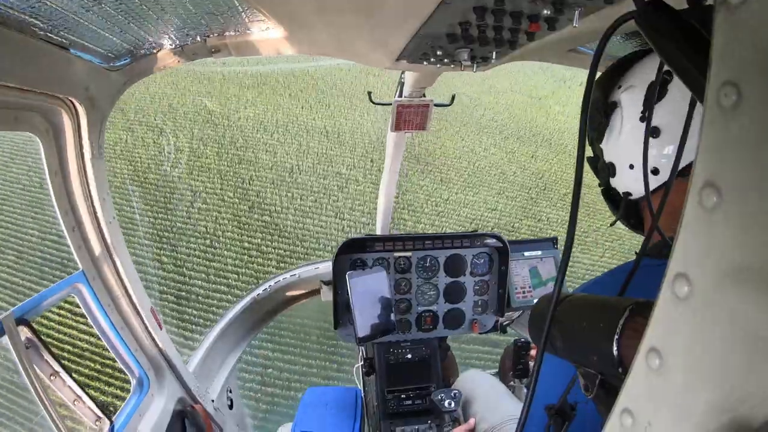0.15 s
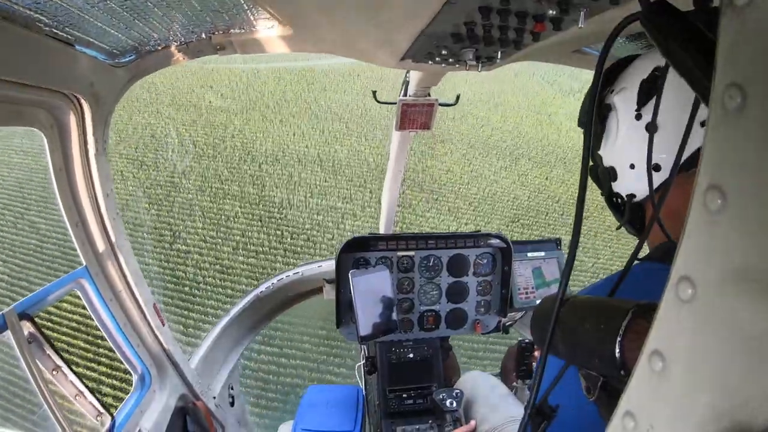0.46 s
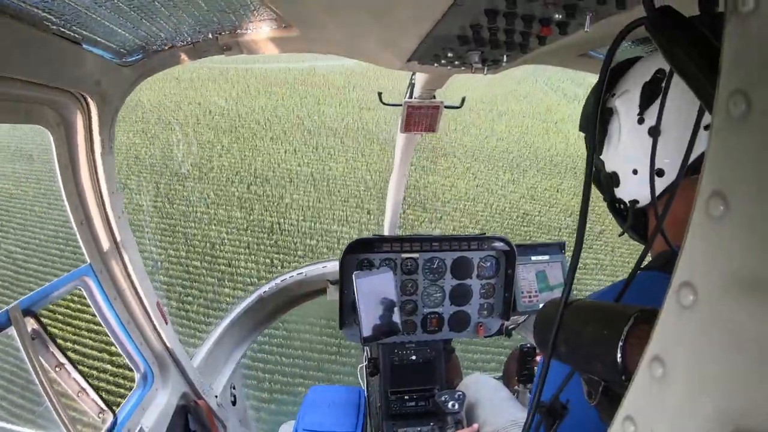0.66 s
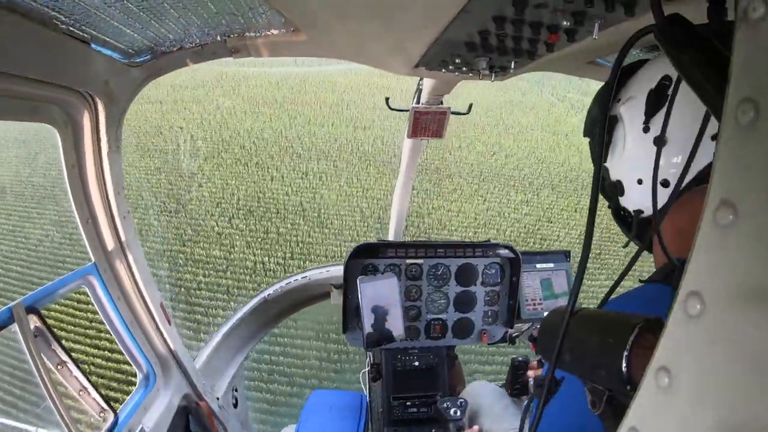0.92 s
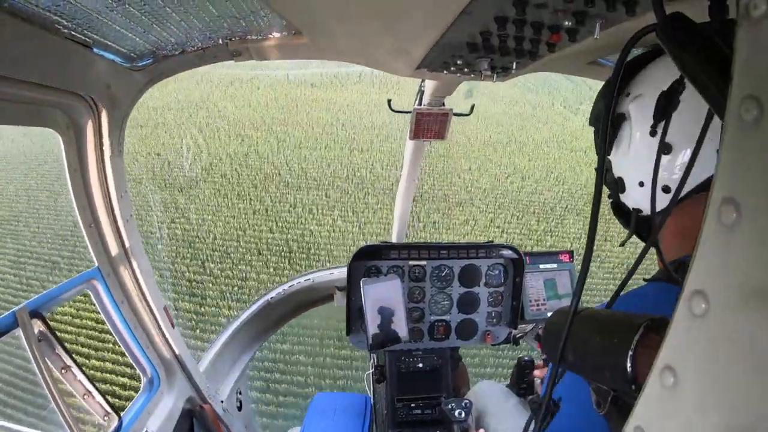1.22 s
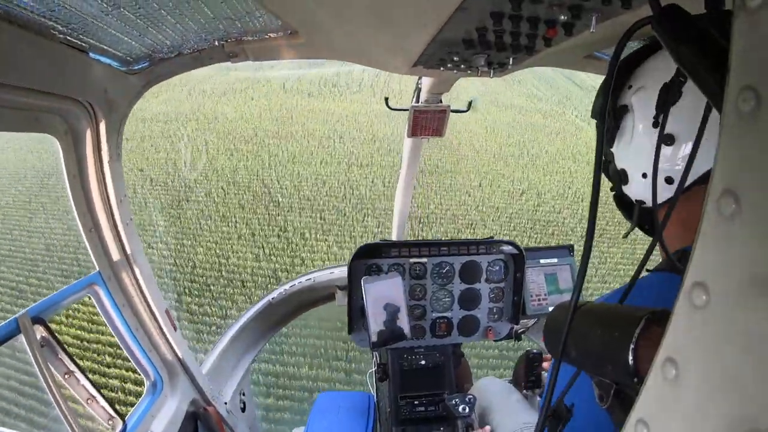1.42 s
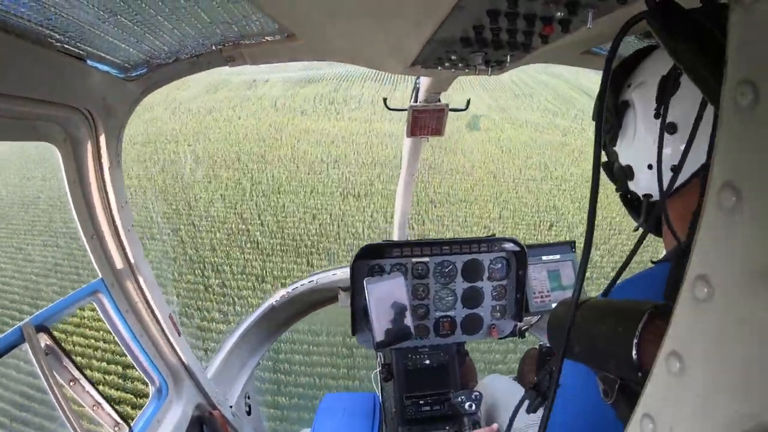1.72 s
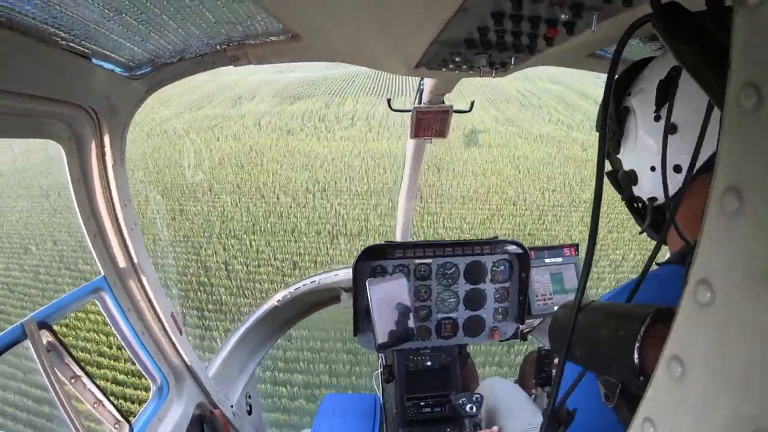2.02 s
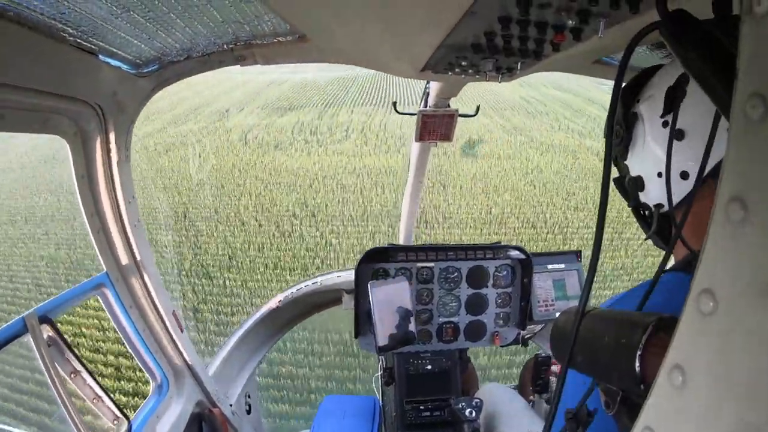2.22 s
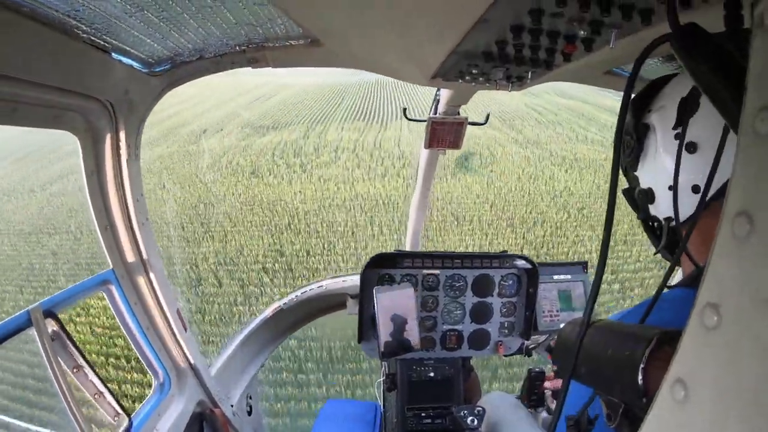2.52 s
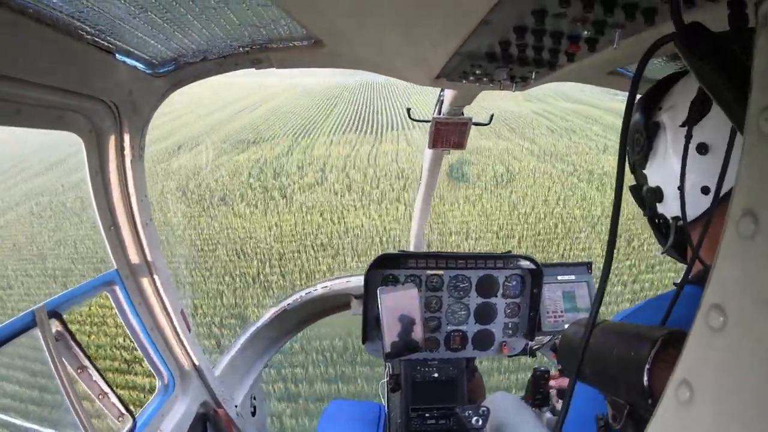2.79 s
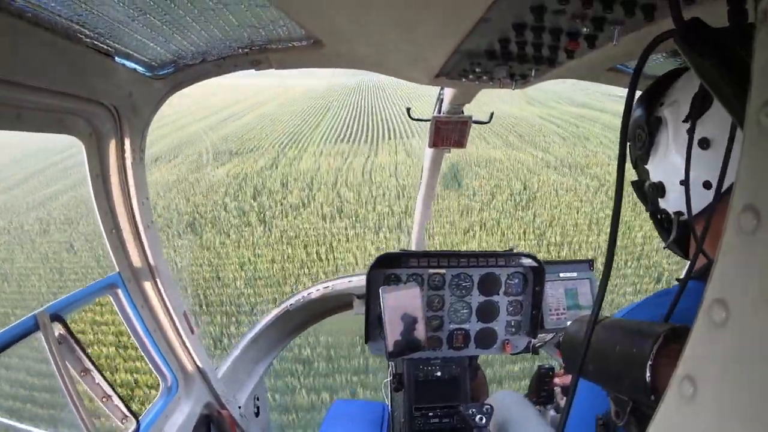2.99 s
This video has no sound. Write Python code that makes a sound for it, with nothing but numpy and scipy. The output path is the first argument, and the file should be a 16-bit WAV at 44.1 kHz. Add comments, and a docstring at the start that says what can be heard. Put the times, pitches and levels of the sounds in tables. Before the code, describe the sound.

Helicopter in steady flight, recorded inside the cockpit: rapid low rotor drumming, boomy air roar, and a continuous gear and turbine whine that rises very slightly; close, enclosed, loud, without speech.

```python
"""A turbine helicopter in steady low flight, heard inside the cockpit.
The two-bladed main rotor drums on the cabin and the tail rotor hums: both are sums of slightly unsteady tones.
Gears sing and the gas turbine whines in the same way; the turbine speeds up a little.
Air roars around the cabin and hisses through the door seals, puffing with each blade: both are shaped noise."""
import sys
import numpy as np
from scipy import signal
from scipy.fft import rfft, irfft, next_fast_len
from scipy.io import wavfile
from scipy.ndimage import uniform_filter1d

SR = 44100
rng = np.random.default_rng(int(sys.argv[2]) if len(sys.argv) > 2 else 0)


def pcm_store(signal):
    """Save signal as 16-bit PCM."""
    levels = np.round(np.clip(np.atleast_2d(signal), -1, 1) * 32767)
    wavfile.write(sys.argv[1], SR, levels.astype(np.int16).T)


N = 138915
TIME = np.arange(N) / SR  # s

# Level drift [dB] of input gear mesh, planet mesh and turbine shaft; flutter [share of tone] of the latter two
STEADY_DRIFT_DB, STEADY_FLUTTER = 0.24, 0.13


def amp(db):
    """Turns decibels into a gain."""
    return 10 ** (np.asarray(db) / 20)


def unit(x):
    """Scales a signal to an rms (average strength) of 1."""
    return x / np.sqrt(np.mean(abs(x) ** 2) + 1e-20)


def curve(points, column=1):
    """Joins one column of (time, value, ..) rows by straight lines."""
    table = np.transpose(points)
    return np.interp(TIME, table[0], table[column])


def colour(points, hz):
    """Reads the gain at each frequency from (frequency [Hz], level [dB]) rows."""
    f, db = np.transpose(points)
    return amp(np.interp(np.log(hz + 1), np.log(f + 1), db))


def shaped(gain):
    """Makes noise of rms 1 whose spectrum follows gain(Hz)."""
    size = next_fast_len(N + SR)
    spectrum = rfft(rng.standard_normal(size))
    noise = irfft(spectrum * gain(np.fft.rfftfreq(size, 1 / SR)), size)
    return unit(noise[:N])


def wander(hz):
    """Makes a random motion of rms 1, mostly slower than hz."""
    motion = shaped(lambda f: 1 / (1 + (f / hz) ** 3))
    return unit(motion - motion.mean())


def tone(turns, db, drift_db, flutter):
    """Makes one sine tone that drifts in level and flutters in level and phase."""
    drift_hz, flutter_hz = 4, 23.3
    # The two parts of a complex number shake level and phase together
    jitter = (wander(flutter_hz) + 1j * wander(flutter_hz)) / np.sqrt(2)
    body = unit((1 + flutter * jitter) * amp(drift_db * wander(drift_hz)))
    spin = np.exp(2j * np.pi * (turns + rng.random()))  # starts at a random phase
    return np.sqrt(2) * amp(db) * (body * spin).real


def rotors(blade):
    """Passing main and tail rotor blades drum on the cabin at multiples of their blade rates."""
    # Main rotor tones: multiples of the blade rate, and their levels [dB]
    main_orders = [1, 2, 4, 5, 6, 7]
    main_db = [-29.5, -32, -24, -29, -30, -33]
    # The cabin booms most at the third multiple: (time [s], level [dB])
    boom_db = [(0, -38), (.5, -16), (1, -20.5), (1.45, -21), (1.7, -18), (2.2, -15), (2.45, -19),
               (2.8, -15.5), (3.15, -17.5)]
    # Tail rotor's own blade tone: (time [s], level [dB])
    tail_db = [(0, -36), (.7, -24), (1.4, -20), (1.8, -27.5), (2.2, -34), (2.6, -25.5), (3.15, -25.5)]
    # Its overtones: (multiple of the tail blade rate, level [dB])
    tail_overtones = [(2, -34), (3, -33), (5, -39)]
    tail_order = 6.49  # tail blade passes per main blade pass
    drift_db, flutter = 2.54, 0.059

    out = tone(3 * blade, curve(boom_db), drift_db=-1.0, flutter=0.07)
    for order, db in zip(main_orders, main_db):
        out += tone(order * blade, db, drift_db, flutter)
    for harmonic, db in [(1, curve(tail_db))] + tail_overtones:
        out += tone(harmonic * tail_order * blade, db, drift_db, flutter)
    return out


def gearbox(blade):
    """Meshing teeth and turning shafts sing at fixed multiples of the main rotor's blade rate."""
    # Input gear's mesh tone: (time [s], level [dB])
    bevel_db = [(0, -36), (.8, -31.5), (1.5, -33.5), (2.3, -34.5), (3.15, -39.5)]
    # Lesser gears and shafts: multiples of the blade rate, and their levels [dB]
    gear_orders = [7.63, 42.24, 57, 76.32, 129.73, 147.33, 150.34, 162.9, 169, 198]
    gear_db = [-25.5, -37, -37.5, -40.5, -51, -43.5, -46, -53, -64, -56.5]
    # High gear whines that swell and fade: multiples of the blade rate
    whine_orders = [190.78, 290, 381.54, 1055.6]
    # Their levels: (time [s], level of 1st, 2nd, 3rd, 4th whine [dB])
    whine_db = [(0, -42, -45, -54, -80), (.16, -45.5, -51, -44, -71), (.7, -47.5, -53, -46, -75),
                (1.15, -49.5, -47, -49.5, -86), (1.6, -47.5, -54, -49, -78), (2.1, -46, -55, -45, -78),
                (2.65, -44.5, -51, -48, -68), (3.15, -47, -55, -47.5, -73)]

    out = tone(145 * blade, curve(bevel_db), STEADY_DRIFT_DB, flutter=0.28)
    for order, db in zip(gear_orders, gear_db):
        out += tone(order * blade, db, drift_db=1.87, flutter=0.31)
    for column, order in enumerate(whine_orders, 1):
        out += tone(order * blade, curve(whine_db, column), drift_db=1.3, flutter=0.43)
    return out


def planets(blade):
    """The planet gears circle inside their ring, which splits their mesh tone into sidebands."""
    # Mesh tone and its sidebands, one blade rate apart from -3 to +3: level before the swell [dB]
    planet_db = [-46.5, -37, -49.5, -22, -33, -43, -38]
    # The same for the mesh tone's restless octave [dB]
    octave_db = [-50, -67, -45, -42, -36.5, -62, -46]
    # Swell of each group: (time [s], change of level [dB])
    planet_swell = [(0, -2.5), (.4, 1), (1, -1), (2.2, 1), (2.7, -2.5), (3.15, -2)]
    octave_swell = [(0, 6), (.45, 3.5), (.75, -7), (1.15, 4.5), (1.6, -5), (2.25, 0), (2.6, -1), (3.15, 1)]
    mesh_order = 49.116  # multiple of the blade rate

    out = np.zeros(N)
    lowest = -(len(planet_db) // 2)
    for side, (mesh_level, octave_level) in enumerate(zip(planet_db, octave_db), lowest):
        mesh_turns = (mesh_order + side) * blade
        octave_turns = (2 * mesh_order + side) * blade
        out += tone(mesh_turns, mesh_level + curve(planet_swell), STEADY_DRIFT_DB, STEADY_FLUTTER)
        out += tone(octave_turns, octave_level + curve(octave_swell), drift_db=2.5, flutter=0.6)
    return out


def turbine():
    """The spinning shaft sounds a tone and overtones; accessory gears and compressor blades whine above."""
    # Shaft speed: (time [s], turns per second [Hz])
    shaft = [(0, 759.4), (.25, 765.8), (.55, 769.3), (.9, 768.9), (1.4, 767.7), (1.75, 768.8), (2.1, 774.8),
             (2.45, 779.9), (3.15, 788.3)]
    # Shaft tone: (time [s], level [dB])
    shaft_db = [(0, -20), (1.1, -21), (1.75, -19.5), (2.3, -24), (3.15, -25)]
    # Overtones: multiples of the shaft speed, and their levels [dB]
    turbine_orders = [3, 4, 6.135, 8.083]
    turbine_db = [-57.5, -57.5, -59, -72]
    # Accessory gear whine and compressor whine: (time [s], level [dB])
    accessory_db = [(0, -64), (.1, -56), (.21, -44.5), (.38, -58.5), (.6, -50.5), (1.2, -50.5),
                    (1.65, -47.5), (2.1, -54), (2.5, -57.5), (2.75, -50.5), (3.15, -53)]
    compressor_db = [(0, -69), (.4, -74), (1.2, -74), (1.8, -75), (2.5, -75), (2.9, -71), (3.15, -71)]

    turns = np.cumsum(curve(shaft)) / SR
    out = tone(turns, curve(shaft_db), STEADY_DRIFT_DB, STEADY_FLUTTER)
    for order, db in zip(turbine_orders, turbine_db):
        out += tone(order * turns, db, drift_db=3.5, flutter=0.3)
    out += tone(7.0833 * turns, curve(accessory_db), drift_db=1.0, flutter=0.34)
    out += tone(16 * turns, curve(compressor_db), drift_db=0.0, flutter=1.3)
    return out


def roar(blade):
    """Faintly patchy air noise booms in the cabin; the rotor wash buffets its upper middle band."""
    # Colour of the roar: (frequency [Hz], relative level [dB])
    roar_colour = [(8, -19), (25, -11), (45, -5.5), (66, -9.5), (105, -6), (135, -5), (170, 1), (195, -2.5),
                   (215, -12), (250, -5), (300, -10), (480, -13), (750, -15.5), (1000, -19.5), (1160, -27),
                   (1290, -24.5), (1420, -31), (2000, -30), (2800, -33.5), (3600, -38), (4700, -43),
                   (5800, -51), (8000, -61), (12000, -81)]
    # Slow swell: (time [s], change of the body [dB], change of the wash [dB])
    roar_swell = [(0, 2, -0.1), (.45, 0.4, 0.1), (.9, 1.1, 1.6), (1.4, -0.3, 0.5), (1.9, -0.9, 0.5),
                  (2.4, -0.7, -1.1), (2.9, 0, 1.3), (3.15, 0.8, 1.5)]
    # Gusts of wash that strike the cabin: (time [s], half length [s], rise [dB])
    gusts = [(.135, .012, 3), (.777, .009, 5), (.93, .02, 3.8), (1.01, .018, 2), (1.55, .013, 3),
             (1.628, .008, 4), (1.78, .02, 2.2), (2.86, .025, 2), (3.09, .01, 2.6)]
    level_db, patch_db, buffet_db = -17.5, 0.03, 1.47
    wash_low_hz, wash_high_hz = 1150, 4200
    slap_depth, slap_at = 0.13, 0.82  # share of the wash; point within a blade pass [0..1]

    noise = shaped(lambda f: colour(roar_colour, f))
    hz, _, z = signal.stft(noise, SR, nperseg=1024, noverlap=768)
    # Random patches of level over frequency and time, weaker in the bass
    patches = uniform_filter1d(rng.standard_normal(z.shape), size=12, axis=0)
    patches = unit(uniform_filter1d(patches, size=10, axis=1))
    z = z * amp(patch_db * patches * (hz / (hz + 500))[:, None])

    # Split the noise into the wash band and the rest, the body
    above_low = hz ** 4 / (hz ** 4 + wash_low_hz ** 4)
    band = (above_low / (1 + (hz / wash_high_hz) ** 4))[:, None]
    body = signal.istft(z * (1 - band), nperseg=1024, noverlap=768)[1][:N]
    wash = signal.istft(z * band, nperseg=1024, noverlap=768)[1][:N]

    slap = 1 + slap_depth * np.cos(2 * np.pi * (blade - slap_at))
    gust_db = sum(rise * np.exp(-((TIME - at) / half) ** 2) for at, half, rise in gusts)
    buffet = amp(curve(roar_swell, 2) + gust_db + buffet_db * wander(hz=30.5))
    return amp(level_db) * (body * amp(curve(roar_swell)) + wash * slap * buffet)


def seals(blade):
    """Air hisses through the door seals in puffs and a swaying leak; one blade pushes harder than the other."""
    # Colours of the puffing hiss and of the leak: (frequency [Hz], relative level [dB])
    puff_colour = [(5000, -18), (7500, -5), (9500, -4.5), (10800, -1.5), (11500, -7.5), (12300, -5.5),
                   (13500, -14), (14400, -19), (15000, -29)]
    leak_colour = [(4500, -22), (6000, -36), (7000, 3), (8000, 4.5), (9000, -1.5), (11000, -9),
                   (13500, -16), (15000, -33)]
    puff_db, leak_db = -58.5, -58.5
    puff_swing_db, puff_uneven_db, puff_chance_db, leak_swing_db = 5.5, 0.9, 1.5, 2
    puff_at = 0.32  # loudest point within a blade pass [0..1]

    beat = np.cos(2 * np.pi * (blade - puff_at))
    uneven = np.cos(np.pi * (blade - puff_at - 1))  # repeats every two blade passes
    chance_db = puff_chance_db * wander(hz=12)
    puffs = unit(amp(puff_swing_db * beat + puff_uneven_db * uneven + chance_db))
    sway = unit(amp(leak_swing_db * (uneven + wander(hz=32))))
    puffing = amp(puff_db) * puffs * shaped(lambda f: colour(puff_colour, f))
    leaking = amp(leak_db) * sway * shaped(lambda f: colour(leak_colour, f))
    return puffing + leaking


def scene():
    """Adds all sources; rotors, gears, wash and puffs follow the main rotor, the turbine its own shaft."""
    # Main rotor: (time [s], blade passes per second [Hz])
    rotor = [(0, 12.622), (.2, 12.703), (.55, 12.773), (.8, 12.791), (1.1, 12.772), (1.9, 12.756),
             (2.3, 12.76), (3.15, 12.718)]
    blade = np.cumsum(curve(rotor)) / SR  # blade passes so far
    machine = rotors(blade) + gearbox(blade) + planets(blade) + turbine()
    air = roar(blade) + seals(blade)
    return (machine + air)[None]


def record(dry):
    """The recorder rounds off the highest peaks and cuts the treble."""
    ceiling, cut_hz = 0.82, 15100  # ceiling as a share of full scale
    held = dry / (1 + (dry / ceiling) ** 12) ** (1 / 12)
    lowpass = signal.firwin(511, cut_hz, window=("kaiser", 9), fs=SR)
    return signal.oaconvolve(held, lowpass[None], "same")


dry = scene()
out = record(dry)
pcm_store(out)
```